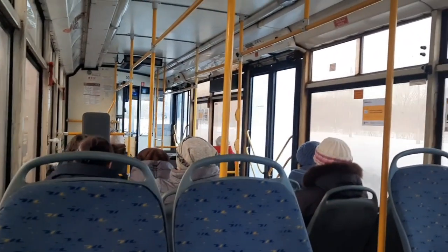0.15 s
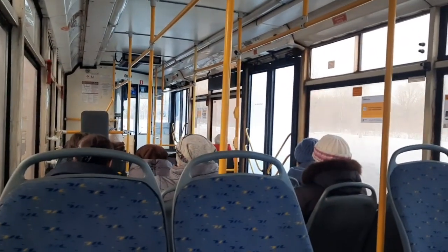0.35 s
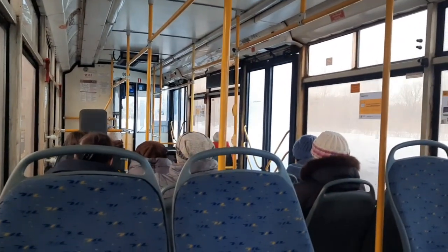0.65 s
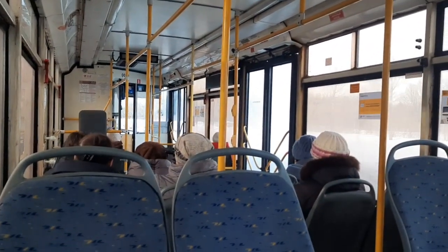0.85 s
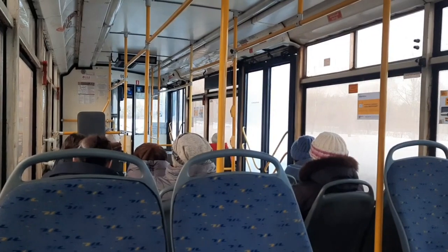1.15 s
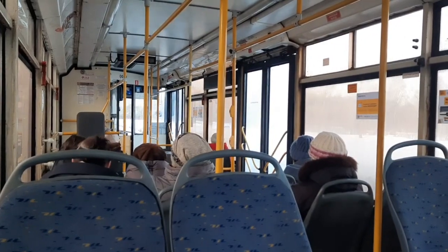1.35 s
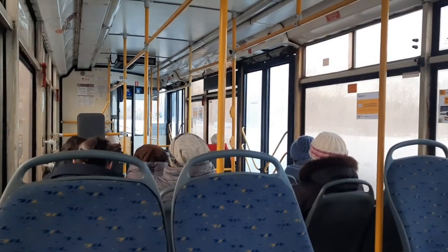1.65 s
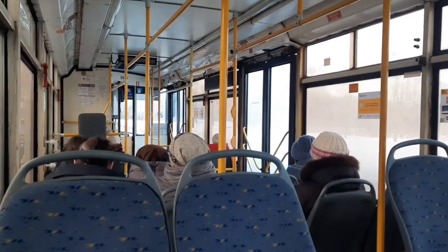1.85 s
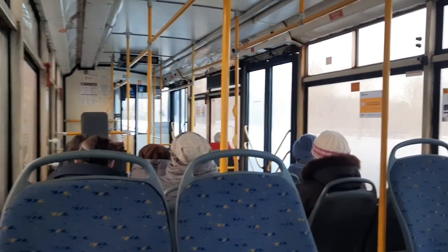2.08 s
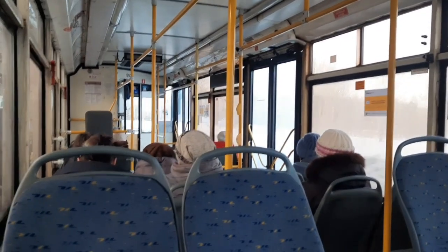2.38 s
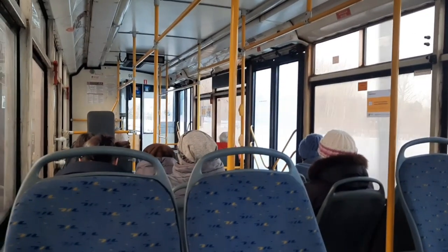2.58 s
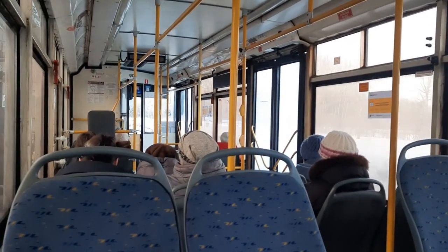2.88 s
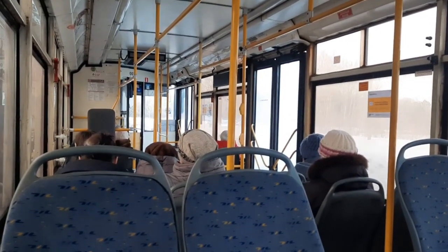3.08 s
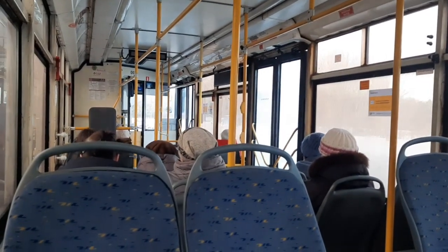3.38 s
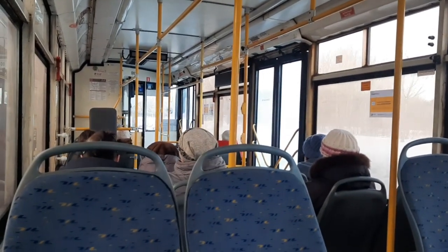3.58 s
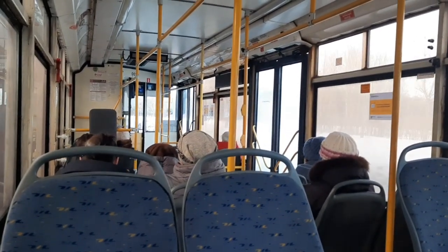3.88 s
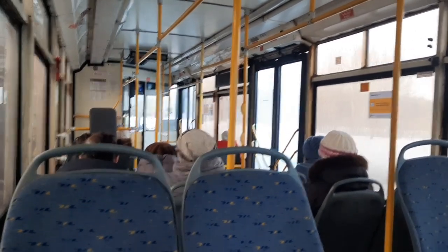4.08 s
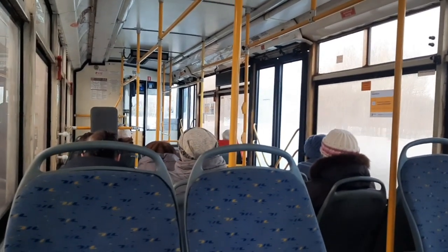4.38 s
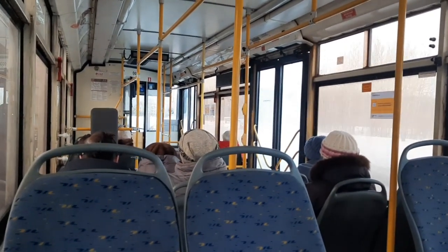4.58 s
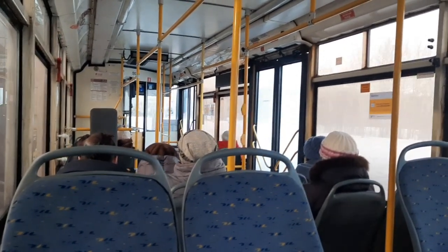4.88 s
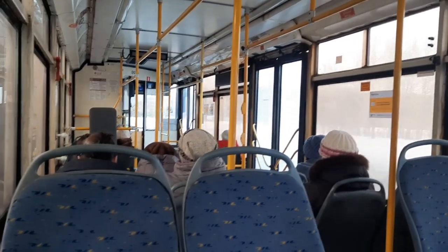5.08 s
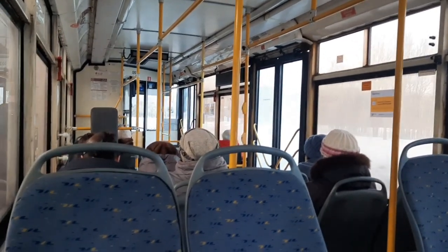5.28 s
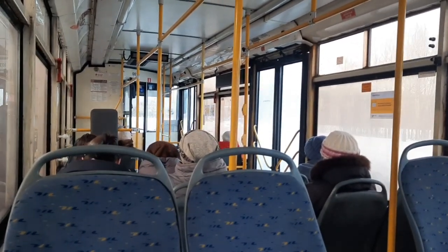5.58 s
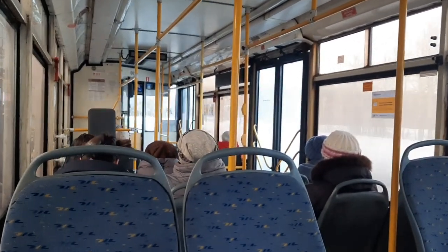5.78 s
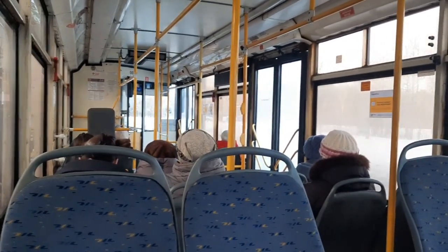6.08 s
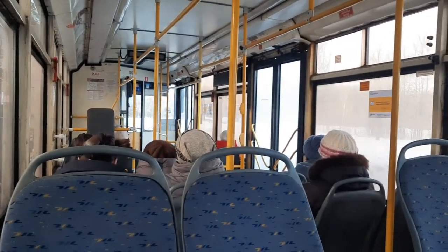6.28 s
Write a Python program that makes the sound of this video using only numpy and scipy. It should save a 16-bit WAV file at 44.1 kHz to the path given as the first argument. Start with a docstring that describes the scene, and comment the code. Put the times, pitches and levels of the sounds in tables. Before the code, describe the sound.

Inside a moving trolleybus, a deep rumble and fluttering low drone run under roaring tyres and a faint hiss of slush. A gear whine rises slightly as the bus pulls. After about a second the road turns rougher, with dull bumps, brief panel hums and light rattles on the right. Just after two seconds the whine softens and slowly sinks as the bus coasts on. The microphone is in the passenger cabin.

```python
"""Inside a trolleybus on a winter road. It pulls with a rising gear whine while tyres roar, slush
hisses and the road shakes the body and booms in the cabin's air. Loose fittings tick and clatter
by the doors on the right. At 1.2 s the road turns rough and slushy, and from 1.7 s single panels
swell into short hums. Just after two seconds the driver lets go: the whine softens and slowly
sinks as the bus coasts on over the bumps."""
import sys
import numpy as np
from scipy import signal
from scipy.fft import rfft, irfft
from scipy.io import wavfile
from scipy.ndimage import uniform_filter1d

SR = 44100
rng = np.random.default_rng(int(sys.argv[2]) if len(sys.argv) > 2 else 0)


def put_to_file(sound):
    """Save the sound as 16-bit audio at rate SR, in the file named by the first command-line argument."""
    columns = np.atleast_2d(sound).T  # one column per channel
    safe = np.clip(columns, -1, 1)
    whole_steps = np.round(safe * 32767)
    wavfile.write(sys.argv[1], SR, whole_steps.astype(np.int16))


N = 284445
TIME = np.arange(N) / SR
FREQ = np.maximum(np.arange(N // 2 + 1) * SR / N, 1)

# spells when the road drives the cabin's air hard: start/s, length/s, main mode/dB, weaker modes/dB
SURGES = [(0.243, 0.13, -28, -40), (1.227, 0.1, -28, -35), (1.407, 0.45, -23.5, -48),
          (2.48, 0.4, -19.5, -30.5), (2.86, .38, -22.5, -24), (3.57, 0.2, -27.5, -21.5),
          (3.832, .22, -21, -36), (4.215, 0.22, -23, -37), (4.484, 0.27, -29, -23),
          (4.722, 0.38, -22.5, -26.5), (5.423, .25, -26, -26.5), (5.9, .3, -30, -26.5),
          (6.384, .15, -23.5, -24)]
SURGE_EDGE_S = 0.03


def undb(db):
    """Decibels to gain."""
    return 10 ** (np.asarray(db) / 20)


def unit(x):
    """Scale to rms 1."""
    return x / np.sqrt(np.mean(x ** 2))


def pan(db):
    """Left and right gains for a level difference; positive leans left."""
    return undb(np.array([[db], [-db]]) / 2)


def after(t, edge_s):
    """A smooth step from 0 to 1 around time t."""
    return .5 + .5 * np.tanh(2 * (TIME - t) / edge_s)


def spell(start, length, edge_s):
    """A soft gate: fade in, hold, fade out."""
    return after(start, edge_s) - after(start + length, edge_s)


def walk(rate_hz):
    """A smooth random modulator with rms 1."""
    return unit(irfft(rfft(rng.standard_normal(N)) * np.exp(-(FREQ / rate_hz) ** 2), N))


def spectra(table):
    """One curve per column of a frequency table, joined on a log axis."""
    f, *columns = np.transpose(table)
    return np.array([np.interp(np.log(FREQ), np.log(f), c) for c in columns])


def resonances(modes):
    """Gain curve of a bank of modes with steep skirts."""
    power = 0
    for hz, width, db in modes:
        detuning = (FREQ / hz - hz / FREQ) * hz / (np.pi / 2 * width)
        power = power + (undb(db) / (1 + detuning ** 2)) ** 2
    return np.sqrt(power)


def field(colour):
    """Stereo noise of a given colour, rms 1: bass centred, middle wide, top hiss near the centre."""
    # left/right correlation of the noise: f/Hz, correlation
    stereo_correlation = [(100, .997), (170, .99), (220, .85), (400, .6), (620, .5), (850, -.05),
                          (1500, -.2), (2000, -.1), (2300, .2), (3300, -.1), (7000, .1), (7900, .8),
                          (15000, .76)]
    correlation = np.clip(spectra(stereo_correlation)[0], -.999, .999)
    mid, side = rfft(rng.standard_normal((2, N)))
    stereo = mid * np.sqrt(1 + correlation) + side * np.sqrt(1 - correlation) * np.array([[1], [-1]])
    return unit(irfft(stereo * colour, N))


def sustained(x, span_s):
    """Level out a vibration's slow swells, so that an envelope can shape it."""
    power = np.mean(x ** 2, axis=0)
    for _ in range(2):
        power = uniform_filter1d(power, max(int(span_s * SR), 1))
    return unit(x / np.sqrt(power))


def hum(hz, drift):
    """A nearly pure tone whose pitch wanders by the fraction drift."""
    pitch_hz = hz * (1 + drift * walk(rate_hz=6.58))
    return np.sqrt(2) * np.sin(2 * np.pi * np.cumsum(pitch_hz) / SR)


def gear_whine():
    """Gear teeth and motor slots sing at shaft multiples, louder under power and on casing resonances."""
    # gear and motor tones: shaft multiple, coasting level/dB, power lift/dB, pan/dB, left lead/rad
    partials = [(6, -38, 2, 0.5, -0.27), (12, -45, 0, -3, 0.12), (18, -49, 14.5, -1.5, -0.77),
                (24, -46, 5.3, -4.5, -0.66), (36, -55.5, 7.5, 4, 1.1)]
    # narrow gear casing resonances that lift a tone gliding through: f/Hz, width/Hz, lift/dB
    casing = [(420.5, 2.4, 8.5), (560, 5, 2.5), (831.3, 5.5, 8.5), (841, 2.6, 7.5)]
    start_hz, climb_hz_per_s, sag_hz_per_s, top_s = 22.56, .375, .2, 2.22
    shaft_hz = start_hz + climb_hz_per_s * np.minimum(TIME, top_s)
    shaft_hz -= sag_hz_per_s * np.maximum(TIME - top_s, 0)
    pulling = 1 - after(2.26, edge_s=0.15)
    shaft_angle = 2 * np.pi * np.cumsum(shaft_hz * (1 + .0006 * walk(rate_hz=7.4))) / SR
    out = 0
    for order, db, power_db, pan_db, lead in partials:
        tone = np.sqrt(2) * np.sin(order * shaft_angle + np.array([[lead], [0]]))
        tone_hz = order * shaft_hz
        casing_db = sum(lift * np.exp(-(2 * (tone_hz - hz) / width) ** 2) for hz, width, lift in casing)
        waver_db = 1.16 * walk(rate_hz=7.1)
        out = out + tone * pan(pan_db) * undb(db + pulling * power_db + casing_db + waver_db)
    return out


def tyres(rough):
    """The treads roar, set the panels ringing and throw up a hiss of slush."""
    # colour of the tyre roar: f/Hz, left level/dB, right level/dB
    roar_colour = [(25, -28, -28), (45.3, 0, -2), (169, 4.5, 0.7), (261, -1.5, -4.5), (384, -0.7, .4),
                   (507, -6.1, -11), (774, -9.5, -12.5), (1040, -11.1, -13), (1340, -15, -14.5),
                   (2190, -17.9, -17.5), (3450, -25.5, -26.5), (5030, -30.5, -28.5), (8200, -43.5, -36.5),
                   (15100, -44.5, -40.5)]
    # wall and window panel modes: f/Hz, width/Hz, relative level/dB
    panel_modes = [(279.8, 9.5, -0.5), (311.6, 6.5, -3), (371, 4.4, -1.5), (408, 8.8, -5), (439.5, 5.4, -1),
                   (476.6, 14, -6), (634, 17, -11.5), (870, 30, -18.5)]
    # colour of the spray: f/Hz, left level/dB, right level/dB
    spray_colour = [(1500, -30.5, -30.5), (3740, -8.1, -7.1), (4830, -19, -3.1), (6160, -14.5, .2),
                    (7440, -12.6, -9.6), (8740, -12.2, -9.1), (9800, -16.2, -17.1), (12500, -12, -14.1),
                    (15700, -20.5, -22)]
    # patches of slush or cleared road: start/s, length/s, roar change/dB, hiss change/dB
    patches = [(1.15, 0.76, 2.3, 3.5), (1.903, 0.69, 2, 2.5), (2.9, 0.84, 0, 1), (4.52, 0.52, 0.1, -2.5),
               (5.08, 0.33, 0.4, 1.5), (5.92, .7, 0.8, -0.8)]
    roar_db, hiss_db = -26.35 + 0.13 * rough, -45.5
    for start, length, more_roar_db, more_hiss_db in patches:
        inside = spell(start, length, edge_s=.22)
        roar_db = roar_db + more_roar_db * inside
        hiss_db = hiss_db + more_hiss_db * inside
    roar = field(undb(spectra(roar_colour))) * undb(roar_db + 0.62 * walk(rate_hz=17))
    # the panels feel a change of road surface less than the air does
    panels = field(resonances(panel_modes)) * undb(0.42 * (roar_db - roar_db.mean()) - 35.0)
    spray = field(undb(spectra(spray_colour))) * undb(hiss_db + 0.83 * walk(rate_hz=28))
    return roar + panels + spray


def jolt(t, attack_s=0.039, decay_s=0.074):
    """A wheel climbs a bump quickly and the suspension lets it die away."""
    age = TIME - t
    return np.exp(-(np.minimum(age, 0) / attack_s) ** 2 - np.maximum(age, 0) / decay_s)


def ride(rough):
    """Envelopes of body shake and cabin boom, from the road's grain, bumps and surges."""
    # bumps under the wheels: t/s, shake level/dB, boom level/dB
    bumps = [(.06, -23, -30), (.34, -20, -36), (1.27, -26, -24), (1.68, -24.5, -37), (1.85, -21, -21),
             (2.04, -20.5, -25), (2.24, -22.5, -25), (2.37, -27, -21.5), (3.42, -21.5, -38),
             (3.83, -26, -46), (4.11, -15.5, -22), (4.36, -23, -30), (4.98, -22, -32), (5.16, -18.5, -38),
             (5.45, -28, -34), (5.68, -27, -30), (6.05, -18, -31), (6.44, -20, -26)]
    shake_power = undb(-32 + 6 * rough) ** 2
    boom_power = undb(-32.5 + 4.5 * rough) ** 2
    for t, shake_db, boom_db in bumps:
        push = jolt(t)
        shake_power += (undb(shake_db) * push) ** 2
        boom_power += (undb(boom_db) * push) ** 2
    for start, length, _, boom_db in SURGES:
        boom_power += undb(boom_db) ** 2 * spell(start, length, SURGE_EDGE_S)
    return np.sqrt(shake_power), np.sqrt(boom_power)


def rumble(shake, boom):
    """The road shakes the body and pumps the cabin's air."""
    # body modes on the suspension: f/Hz, width/Hz, relative level/dB
    body_modes = [(40.3, 8, -21), (67, 13, 0.5), (84.3, 18, -0.5), (117, 14, -2.5)]
    # the cabin's weaker air modes: f/Hz, width/Hz, relative level/dB
    air_modes = [(121, 10, -7), (156.4, 14.3, 3), (168.7, 17, -3.5)]
    body = sustained(field(resonances(body_modes)), span_s=0.088) * shake * pan(.6)
    air = sustained(field(resonances(air_modes)), span_s=0.1) * boom * pan(2.0)
    return body + air


def cabin_drone(rough):
    """The cabin's strongest air mode rings on as one low note that flutters and surges."""
    power = undb(-30.5 + 0.5 * rough + 3.4 * walk(rate_hz=15)) ** 2
    for start, length, db, _ in SURGES:
        power += undb(db) ** 2 * spell(start, length, SURGE_EDGE_S)
    note = hum(hz=141.5, drift=0.02378)
    flutter = undb(1.86 * walk(rate_hz=12.5))
    return note * np.sqrt(power) * flutter * pan(3.0)


def floor_throb(shake):
    """A deep vibration under the floor that swells a little on the bumps."""
    return hum(hz=33.4, drift=0.02) * unit(shake) ** .49 * undb(2.2 * walk(rate_hz=2.4) - 39.0)


def ticks(per_s=3.7, db=-47, spread_db=2, t60=.035, chatter_s=.001):
    """The smallest rattles come at random: extra rows for the loose fittings."""
    draws = rng.random((int(per_s * N / SR), 3))
    return [(when * N / SR, db + spread_db * (2 * size - 1), t60, chatter_s, latch_share)
            for when, size, latch_share in draws]


def loose_fittings():
    """The door latch and window frames chatter briefly and ring out on the right."""
    # rattles: t/s, level/dB, ring time to -60 dB/s, chatter time/s, latch's share of the power
    rattles = [(.361, -43, .05, .002, .2), (1.279, -40, .1, .004, .5), (1.59, -45, .2, .06, 0.1),
               (1.708, -42, .057, .002, .5), (1.845, -40, .044, .002, .5), (1.910, -38, .03, .001, 0.3),
               (2.066, -26, .018, 0.00089, .7), (2.072, -34, 0.17, .004, .95), (2.296, -43, .08, .003, .7),
               (2.404, -41, 0.11, .004, .56), (2.447, -41, 0.17, .005, .6), (2.713, -40, .04, .002, .5),
               (3.278, -41.5, .1, .018, .19), (3.296, -32.5, .19, 0.012, 0), (3.431, -40.5, .04, .003, .3),
               (3.648, -44.5, .071, .004, .3), (3.950, -44, .086, .004, .28), (4.432, -42.5, .05, .002, .5),
               (5.125, -45, .15, .015, .4), (5.278, -40, .05, .002, .4), (6.386, -40, 0.13, .003, .4)]
    # door latch modes: f/Hz, width/Hz, relative level/dB
    latch_modes = [(5170, 68, 10.5), (6200, 700, 6.5), (7840, 1800, -7), (11200, 1500, -4), (12500, 60, 3),
                   (12950, 600, 1), (14300, 2200, -4.5)]
    # modes of the thin window frames: f/Hz, width/Hz, relative level/dB
    frame_modes = [(3000, 1600, -5), (5870, 1500, 0.5), (7000, 1600, -7), (8640, 120, 1), (8630, 60, 8.5),
                   (8960, 120, 7), (9650, 100, 5.5), (11500, 2100, -3.5), (14900, 3400, -4.5)]
    latch_power, frame_power = np.zeros((2, N))
    for t, db, t60, chatter_s, latch_share in rattles + ticks():
        age = TIME - t
        power = (age >= 0) * undb(db - 60 * np.maximum(age - chatter_s, 0) / t60) ** 2
        latch_power += latch_share * power
        frame_power += (1 - latch_share) * power
    latch = field(resonances(latch_modes)) * np.sqrt(latch_power)
    frames = field(resonances(frame_modes)) * np.sqrt(frame_power)
    # the parts touch and part many times within one rattle
    grain = undb(1.6 * walk(rate_hz=390))
    return (latch + frames) * grain * pan(-5.0)


def panel_swells():
    """Now and then the shaking finds one panel's own note."""
    # short panel hums: peak t/s, f/Hz, level/dB, half length/s
    swells = [(1.706, 690, -37, 0.032), (2.452, 432, -36, 0.043), (3.753, 277.5, -35.5, 0.087),
              (4.025, 431, -39, 0.056), (4.307, 312, -36, 0.12), (4.547, 328.6, -37, 0.12),
              (5.94, 436.5, -39, 0.035), (6.108, 441, -35, 0.031)]
    out = 0
    for t, hz, db, half_length in swells:
        envelope = np.exp(-((TIME - t) / half_length) ** 2 / 2)
        out = out + hum(hz, drift=0.0116) * undb(db) * envelope
    return out


def scene():
    """Mix the low end with tyres, panels, whine and rattles as the road turns from smooth to rough."""
    rough = after(1.2, edge_s=.12)
    shake, boom = ride(rough)
    left, right = rumble(shake, boom) + cabin_drone(rough) + floor_throb(shake)
    left_lag_s = 0.00024
    bass = np.array([np.interp(TIME - left_lag_s, TIME, left), right])
    return bass + tyres(rough) + panel_swells() + gear_whine() + loose_fittings()


def record(dry):
    """Roll off the deepest bass and cut the very top steeply."""
    low_cut = signal.butter(6, 28, "high", fs=SR, output="sos")
    high_cut = signal.ellip(10, .1, 80, 15750, fs=SR, output="sos")
    return signal.sosfilt(high_cut, signal.sosfilt(low_cut, dry))


dry = scene()
out = record(dry)
put_to_file(out)
```